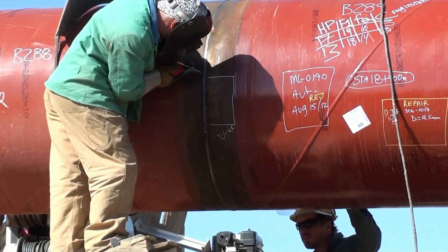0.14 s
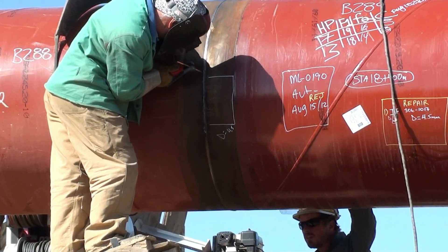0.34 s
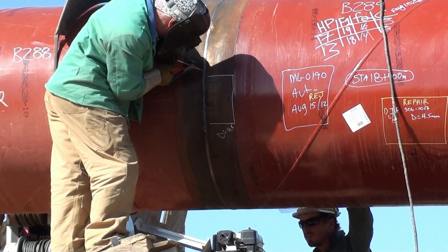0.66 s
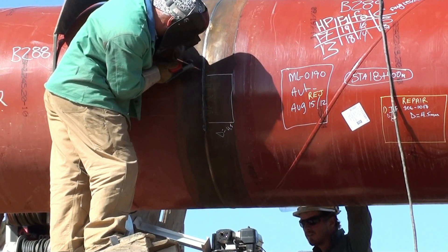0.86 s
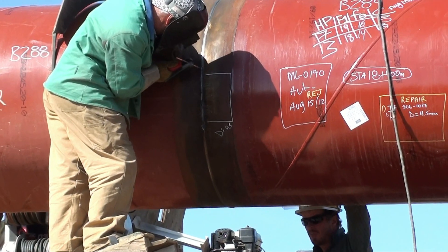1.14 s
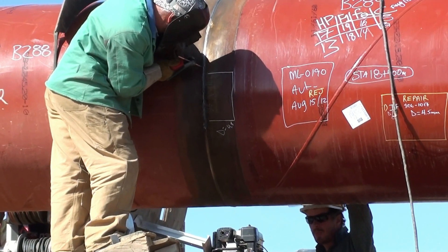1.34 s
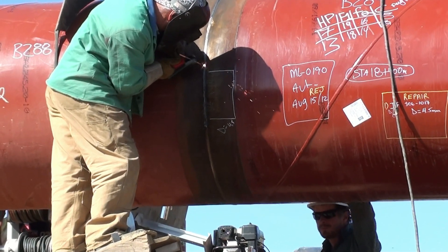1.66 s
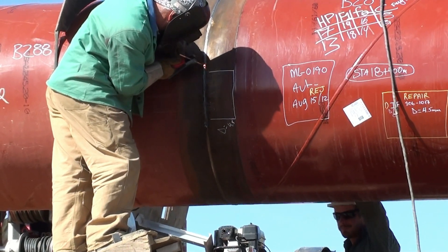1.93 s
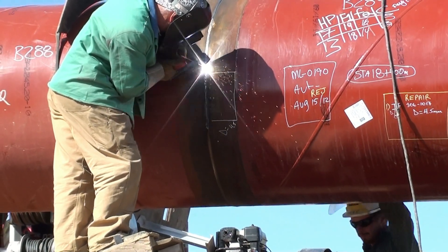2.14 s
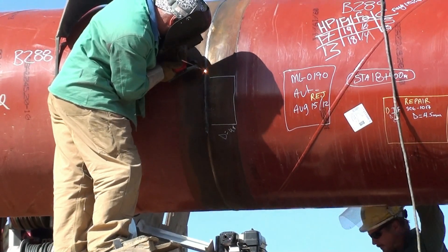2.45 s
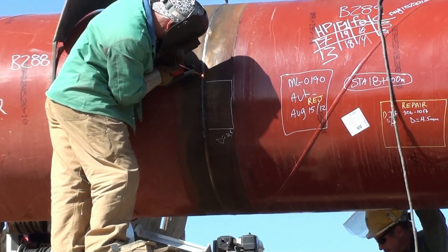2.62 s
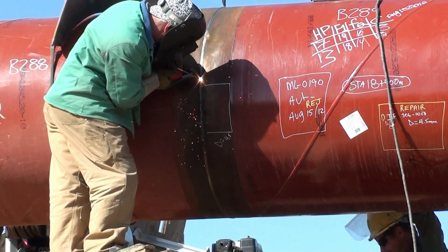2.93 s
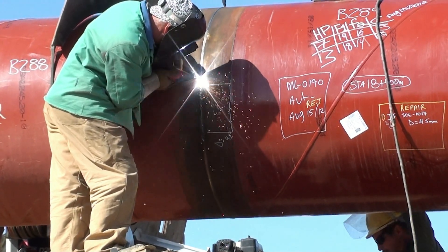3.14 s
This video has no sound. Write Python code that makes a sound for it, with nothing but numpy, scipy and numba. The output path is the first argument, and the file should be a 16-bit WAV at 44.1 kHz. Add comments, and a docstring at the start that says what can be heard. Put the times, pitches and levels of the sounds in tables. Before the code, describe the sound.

Outdoors, a nearby gouging torch lets out a loud, sharp hiss of compressed air that pushes down the drone of engines. Then brief, irregular arc strikes snap and spit on a steel pipe while the hiss carries on.

```python
"""Air-arc gouging on a steel pipeline

Outdoors, with engines running close by, an air valve opens and shaped noise makes a loud hiss.
A carbon electrode then strikes six sputtering arcs, made of noise and thousands of tiny snaps.
The engines are steady tones over throbbing noise, and the torch also echoes off steel and ground.
A gain control turns the engines down under the hiss, and far more under each arc."""
import sys
import numpy as np
from scipy import signal
from scipy.fft import rfft, irfft
from scipy.io import wavfile
from scipy.ndimage import map_coordinates
from numba import njit

SR = 44100
rng = np.random.default_rng(int(sys.argv[2]) if len(sys.argv) > 2 else 0)


def put_to_file(sound):
    """Save the sound as 16-bit audio at rate SR, in the file named by the first command-line argument."""
    columns = np.atleast_2d(sound).T  # one column per channel
    safe = np.clip(columns, -1, 1)
    whole_steps = np.round(safe * 32767)
    wavfile.write(sys.argv[1], SR, whole_steps.astype(np.int16))


N = 144648
T = np.arange(N) / SR   # time of each sample, s
HZ = np.maximum(np.fft.rfftfreq(N, 1 / SR), 1)   # pitch of each spectrum bin


def from_db(db):
    """Decibels to gain."""
    return 10 ** (np.asarray(db) / 20)


def rms_one(x):
    """Scale to rms 1."""
    return x / np.sqrt(np.mean(x ** 2) + 1e-20)


def over_hz(points):
    """Read a table at every pitch, in straight lines on a log-frequency axis."""
    hz, value = np.transpose(points)
    return np.interp(np.log(HZ), np.log(hz), value)


def bell(hz, width):
    """A bell of height 1 on the frequency axis."""
    return np.exp(-.5 * ((HZ - hz) / width) ** 2)


def drift(rate_hz):
    """Slow random wandering with spread 1: noise smoothed twice, made at a twentieth of the rate."""
    r = np.exp(-2 * np.pi * rate_hz * 20 / SR)
    noise = rng.standard_normal(N // 20 + 4002)
    slow = signal.lfilter([1], [1, -2 * r, r * r], noise)[4000:]   # skip the filter's start-up
    return np.interp(np.arange(N) / 20, np.arange(len(slow)), rms_one(slow))


def colour(x, spectrum=None, peaks=()):
    """Filter with a broad spectrum plus bell-shaped peaks and dips, ringing only forward; rms 1."""
    db = over_hz(spectrum) if spectrum else 0
    db = db + sum(g * bell(hz, width) for hz, width, g in peaks)
    # folding the cepstrum forward keeps the response from starting before the sound
    cepstrum = irfft(np.log(from_db(db)), N)
    causal = cepstrum * (1 + np.sign(N / 2 - np.arange(N))) * (np.arange(N) > 0)
    return rms_one(irfft(rfft(x) * np.exp(rfft(causal)), N))


def stereo_noise(likeness):
    """White noise left and right, from unrelated (likeness 0) to identical (likeness 1)."""
    c = np.clip(likeness, 0, 1)
    mid, side = rfft(rng.standard_normal((2, N)))
    return irfft(np.sqrt(1 + c) * mid + np.sqrt(1 - c) * side * [[1], [-1]], N)


# arcs: start_s, length_s, level_db, crackle_db, build_s (time for the crackle to build)
ARC_STRIKES = [(1.716, 0.03, 13, -1, 0.028), (1.771, 0.087, 14.5, 3, 0.028),
               (2.108, 0.18, 16.5, 1.5, 0.013), (2.82, 0.07, 13, 5, 0.042),
               (2.931, 0.037, 18.5, 4.5, 0.0086), (3.123, 0.15, 15, 2, .012)]
# single spits of molten metal: start_s, level_db
METAL_SPITS = [(1.74, 19), (1.802, 19), (1.822, 25), (1.851, 7), (2.167, 16), (2.877, 16), (2.893, 10),
               (3.255, 19)]
# the arc's rushing hiss: pitch_hz, relative_level_db (per Hz)
ARC_HISS_SPECTRUM = [(100, -66), (2000, -15), (4000, -11.5), (5200, 3), (6100, -4.5), (7400, 7), (8400, 1),
                     (10000, -6.5), (12000, -13.5), (16000, -25)]
# the arc's crackle: pitch_hz, relative_level_db (per Hz)
CRACKLE_SPECTRUM = [(30, -50), (150, -13.5), (800, -1), (2000, 0.5), (3200, 4), (5500, 0), (8000, 3),
                    (11000, -5.5), (16000, -18)]
# fixed resonances and dips that pipe and groove give to arc and jet: pitch_hz, width_hz, change_db
PIPE_RESONANCES = [(1004, 57, -8.5), (1322, 36, 5), (1810, 92, 5.5), (2268, 69, 8), (2800, 260, 2.5),
                   (3440, 140, 1.5), (2410, 57, -4), (4020, 170, -5.5), (4340, 80, 3), (4650, 75, -3),
                   (5330, 88, 4), (5750, 89, 2.5), (6390, 140, 4), (6800, 110, -3.5), (7310, 175, 5),
                   (7780, 79, -11.5), (9240, 310, -4.5)]
# ripple from the wall just behind the nozzle: pitch_hz, width_hz, change_db
WALL_RIPPLE = [(10480, 320, 3), (11730, 380, -6), (12600, 200, 3), (13250, 200, 0), (14230, 270, -4),
               (15350, 250, 1.5)]
ARC_ATTACK_S, ARC_FADE_S, SPIT_DECAY_S = 0.014, 0.017, 0.004
ARC_HISS_DB, CRACKLE_DB = -3.5, -9.5   # trims on top of the levels in the tables
SNAPS_PER_S, SNAP_SPREAD_DB = 3500, 2
SPUTTER_DB, SPUTTER_HZ = 0.9, 202
TORCH_LIKENESS = 0.99   # left-right likeness of the torch noise, 0-1


def arc():
    """Each strike starts as a sputtering hiss; snaps build as metal melts; it fades as its gap widens."""
    burn, melt = np.zeros(N), np.zeros(N)
    for start, length, db, crackle_db, build_s in ARC_STRIKES:
        age = np.maximum(T - start, 0)
        rise = np.minimum(age / ARC_ATTACK_S, 1)
        fade = np.clip((length - age) / ARC_FADE_S, 0, 1)
        level = from_db(db) * rise * fade
        burn += level
        melt += level * from_db(crackle_db) * (1 - np.exp(-(age / build_s) ** 2))
    for start, db in METAL_SPITS:
        melt += from_db(db) * (T > start) * np.exp(-np.abs(T - start) / SPIT_DECAY_S)
    sputter = rms_one(from_db(SPUTTER_DB * drift(SPUTTER_HZ)))
    # snaps at random moments, up or down, some stronger than others
    happens = rng.random(N) < SNAPS_PER_S / SR
    direction = rng.choice([-1, 1], N)
    strength = from_db(SNAP_SPREAD_DB * np.minimum(rng.exponential(1, N), 3.5))
    snaps = happens * direction * strength
    resonances = PIPE_RESONANCES + WALL_RIPPLE
    hiss = colour(stereo_noise(TORCH_LIKENESS) * sputter, ARC_HISS_SPECTRUM, resonances)
    crackle = colour(snaps * sputter, CRACKLE_SPECTRUM, resonances)
    return from_db(ARC_HISS_DB) * burn * hiss + from_db(CRACKLE_DB) * melt * crackle


# air jet over time: time_s, level_db, ripple_shift_percent (as the torch moves),
# lower_hiss_db, top_hiss_db, howl_db
AIR_MOVES = [(.55, -7.5, 2, -1, 0.5, -5), (1.05, -10, 1, 0.5, 2, -4.5), (1.35, -9, -3.5, -4, -3.5, -18),
             (1.65, -11.5, -4, -0.5, -3.5, -27), (1.95, -8.5, .3, -0.5, -0.5, -18),
             (2.55, -9, -0.24, -0.5, -0.5, -14), (3.28, -11.5, .5, 2, -2, -25)]
# the jet's hiss: pitch_hz, relative_level_db (per Hz)
JET_SPECTRUM = [(300, -27.5), (1200, -13.5), (2200, -15), (3000, -7), (3500, -9.5), (5000, -3.5),
                (6000, -4.5), (7100, 3.5), (8050, 5), (8800, 1.5), (9600, -2), (13000, -8), (16000, -15.5)]
# howl of the free jet: pitch_hz, width_hz, relative_level_db
HOWL_BANDS = [(6150, 310, -1.5), (7980, 460, -2)]
VALVE_S, VALVE_OPEN_S = 0.528, 0.025   # when the air comes on, and how long the valve takes
LOWER_HISS_HZ, TOP_HISS_HZ = 5100, 9000   # the lower hiss lies below, the top hiss above
JET_FLUTTER_DB, JET_FLUTTER_HZ = 0.72, 40


def air_jet():
    """Hiss that howls while the nozzle is clear of steel; its top ripple slides as the torch moves."""
    s, *columns = np.transpose(AIR_MOVES)
    db, percent, lower_db, top_db, howl_db = [np.interp(T, s, c) for c in columns]
    rippled = colour(stereo_noise(TORCH_LIKENESS), peaks=WALL_RIPPLE)
    # reading the noise a little faster or slower slides its ripple up or down
    place = np.cumsum(1 + percent / 100)
    slid = np.array([map_coordinates(side, [place], order=5, mode="wrap") for side in rippled])
    hiss = colour(slid, JET_SPECTRUM, PIPE_RESONANCES)
    lower = irfft(rfft(hiss) / (1 + (HZ / LOWER_HISS_HZ) ** 12), N)
    top = irfft(rfft(hiss) / (1 + (TOP_HISS_HZ / HZ) ** 12), N)
    howl_shape = sum(from_db(g) * bell(hz, width) for hz, width, g in HOWL_BANDS)
    howl = rms_one(irfft(rfft(stereo_noise(TORCH_LIKENESS)) * howl_shape, N))
    hiss = hiss + lower * (from_db(lower_db) - 1) + top * (from_db(top_db) - 1)
    jet = hiss + howl * from_db(howl_db)
    valve = np.clip((T - VALVE_S) / VALVE_OPEN_S, 0, 1)
    return jet * valve * from_db(db + JET_FLUTTER_DB * drift(JET_FLUTTER_HZ))


NEAR_DB, NEAR_T60_S = -9.5, 0.059   # T60 is the time to die away by 60 dB
NEAR_APART = 0.056   # how much the two sides differ


def near_scatter(x):
    """Quick, bright reflections off the pipe and its supports put a fine ripple on the spectrum."""
    age = T[:SR // 8]
    shared = rng.standard_normal(len(age))
    tail = shared + NEAR_APART * rng.standard_normal((2, len(age)))
    tail = tail * from_db(-60 * age / NEAR_T60_S)
    tail = tail / np.sqrt(np.sum(tail ** 2) / 2)
    return from_db(NEAR_DB) * signal.fftconvolve(x, tail, axes=1)[:, :N]


ECHO_DB, ECHO_T60_S, ECHO_DELAY_S = -19.5, 0.32, 0.0066   # level before dulling
ECHO_DULL_HZ = 2450


def site_echo(x):
    """Dull, short scatter from ground and machinery, different on each side."""
    age = T[:SR // 2]
    tail = rng.standard_normal((2, len(age))) * from_db(-60 * age / ECHO_T60_S) * (age > ECHO_DELAY_S)
    tail = tail / np.sqrt(np.sum(tail ** 2) / 2)
    tail = signal.sosfilt(signal.butter(2, ECHO_DULL_HZ, fs=SR, output="sos"), tail)
    return from_db(ECHO_DB) * signal.fftconvolve(x, tail, axes=1)[:, :N]


# engine tones: multiple_of_crank_rate, relative_level_db
CRANK_TONES = [(2, -6), (4, 1.5), (5, -1), (8, 0), (10, -12), (14, -7.5), (16, -11.5), (20, -13.5)]
# hum of other machines: pitch_hz, level_db
MACHINE_HUM = [(46.5, -49), (92.7, -24.5), (100, -23), (139, -28.5), (201, -41.5), (231, -34), (348, -33),
               (364, -35.5), (410, -31.5), (417, -35), (560, -31.5), (743, -37), (818, -39)]
# exhaust rumble and mechanical clatter: pitch_hz, relative_level_db (per Hz)
RUMBLE_SPECTRUM = [(25, -63), (60, -18.5), (110, -1.5), (200, 0.5), (420, -3.5), (750, -7.5), (1050, -14),
                   (1500, -13.5), (3200, -15.5), (5000, -18), (7800, -18), (10500, -32.5), (16000, -46)]
# a thin steady whistle in the engine noise: pitch_hz, width_hz, boost_db
ENGINE_WHISTLE = [(6570, 53, 8.5)]
# left-right likeness of the engine noise: pitch_hz, likeness (0-1)
NOISE_LIKENESS = [(100, 1), (300, 0.95), (700, 0.77), (2000, 0.88), (8000, 0.78)]
# where the engines sit: pitch_hz, left_minus_right_db
SIDE_LEVELS = [(60, -2), (125, -3), (280, -4.5), (560, -0.9), (1400, -2.5), (3000, 0)]
# how far the left side leads: pitch_hz, lead_radians
SIDE_LEADS = [(60, -0.27), (260, -0.24), (700, -.1), (1460, 0)]
CRANK_HZ, SPEED_SPREAD = 30.25, 0.002   # turns per second; wander as a share of the speed
TONES_DB, RUMBLE_DB = -16.5, -16
FIRING_DEPTH, CLATTER_DEPTH = 0.051, 0.065   # how deeply the noise throbs, 0-1
CLATTER_HZ = 900   # exhaust lies below, clatter above


def engines():
    """Crank tones and hum over exhaust noise that throbs with the firing and clatters once a turn."""
    turn = 2 * np.pi * np.cumsum(CRANK_HZ * (1 + SPEED_SPREAD * drift(2.3))) / SR
    tones = rms_one(sum(from_db(db) * np.sin(round(k) * turn + rng.uniform(0, 2 * np.pi))
                        for k, db in CRANK_TONES))
    clock = np.cumsum(1 + SPEED_SPREAD * drift(2.26)) / SR   # the hum wanders on its own
    hum = sum(np.sqrt(2) * from_db(db) * np.sin(2 * np.pi * (hz * clock + rng.random()))
              for hz, db in MACHINE_HUM)
    white = stereo_noise(over_hz(NOISE_LIKENESS))
    noise = from_db(RUMBLE_DB) * colour(white, RUMBLE_SPECTRUM, ENGINE_WHISTLE)
    low = irfft(rfft(noise) / (1 + (HZ / CLATTER_HZ) ** 4), N)
    exhaust = low * (1 + FIRING_DEPTH * np.cos(4 * turn))   # four throbs a turn
    clatter = (noise - low) * (1 + CLATTER_DEPTH * np.cos(turn))
    mix = from_db(TONES_DB) * tones + hum + exhaust + clatter
    # half of each left-right difference goes to each side
    sides = np.array([[.5], [-.5]])
    placing = from_db(sides * over_hz(SIDE_LEVELS)) * np.exp(1j * sides * over_hz(SIDE_LEADS))
    return irfft(rfft(mix) * placing, N)


def scene():
    """The torch straight ahead with its reflections, the engines a little to the right."""
    torch = air_jet() + arc()
    return torch + near_scatter(torch) + site_echo(torch) + engines()


@njit
def follow(level, attack, release):
    """Level follower with separate rising and falling speeds."""
    out, held = np.empty(len(level)), 1.0
    for i in range(len(level)):
        held += (level[i] - held) * (attack if level[i] > held else release)
        out[i] = held
    return out


DETECT_S, DETECT_LOW_CUT_HZ = 0.0016, 177   # the level sensor's smoothing and bass cut
GAIN_LIMIT_DB, FAST_RELEASE_DB_PER_S = -15, 853
SLOW_ATTACK_S, SLOW_RELEASE_S = 2.45, 1.74
CUTOFF_HZ = 15800


def record(dry):
    """A fast gain control holds the level, a slow one keeps it down after long overloads; top cut."""
    r = np.exp(-1 / (DETECT_S * SR))
    low_cut = signal.butter(1, DETECT_LOW_CUT_HZ, "high", fs=SR, output="sos")
    sensed = signal.sosfilt(low_cut, dry)
    power = signal.lfilter([1 - r], [1, -r], np.mean(sensed ** 2, axis=0))
    over_db = np.maximum(10 * np.log10(power + 1e-12) - GAIN_LIMIT_DB, 0)
    # the cut follows each rise at once, then lets go at a steady rate in dB
    let_go_db = FAST_RELEASE_DB_PER_S * T
    fast = from_db(np.maximum.accumulate(over_db + let_go_db) - let_go_db)
    slow = follow(fast, 1 / (SLOW_ATTACK_S * SR), 1 / (SLOW_RELEASE_S * SR))
    held = dry / np.maximum(fast, slow)
    top_cut = signal.ellip(12, .2, 90, CUTOFF_HZ, fs=SR, output="sos")
    return signal.sosfilt(top_cut, np.clip(held, -.8, .8))


dry = scene()
out = record(dry)
put_to_file(out)
```